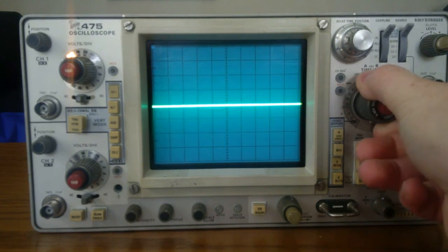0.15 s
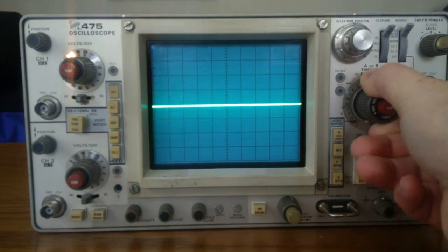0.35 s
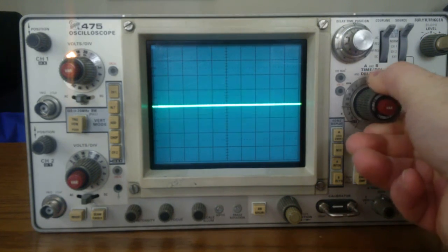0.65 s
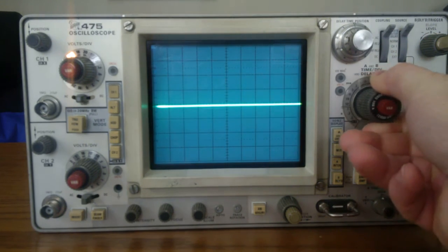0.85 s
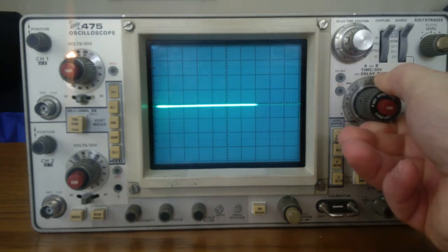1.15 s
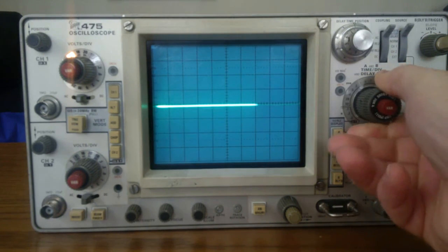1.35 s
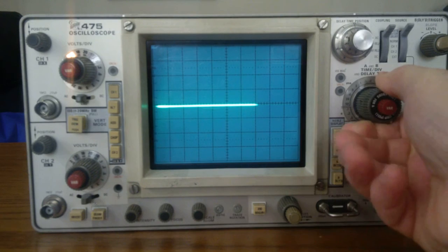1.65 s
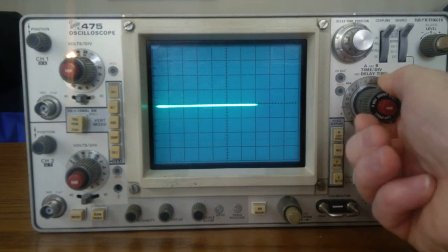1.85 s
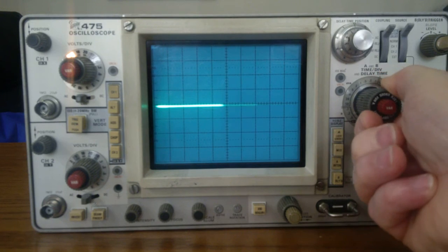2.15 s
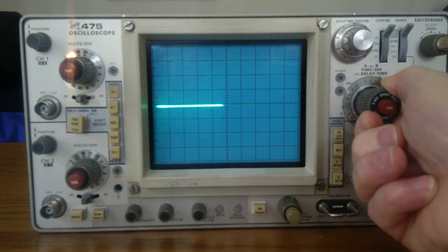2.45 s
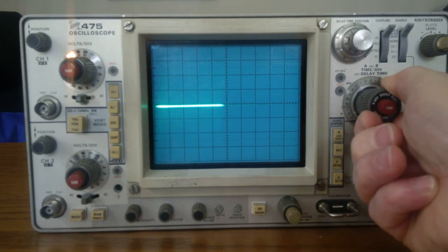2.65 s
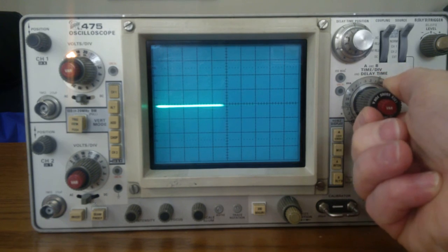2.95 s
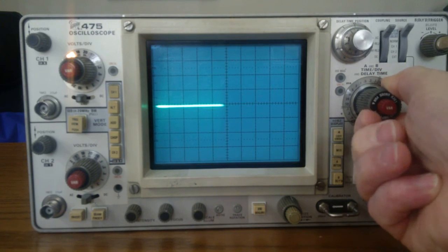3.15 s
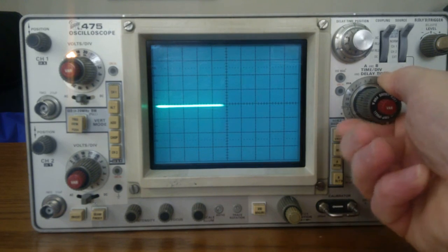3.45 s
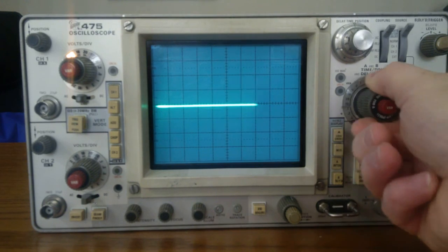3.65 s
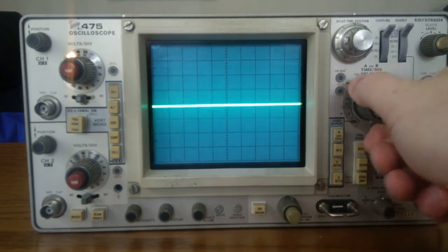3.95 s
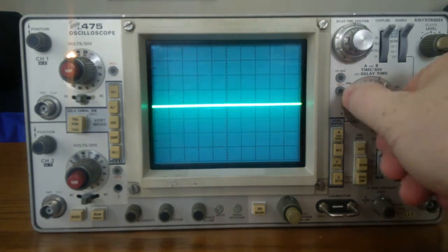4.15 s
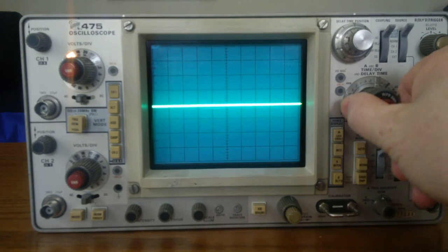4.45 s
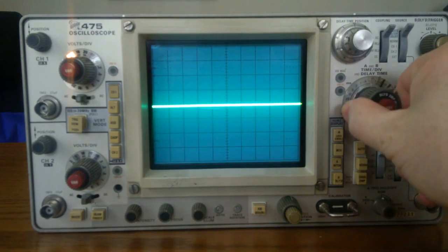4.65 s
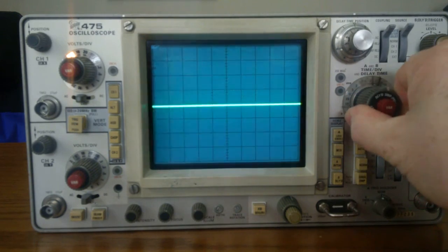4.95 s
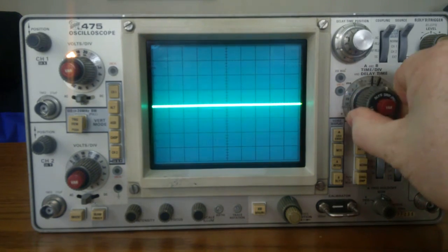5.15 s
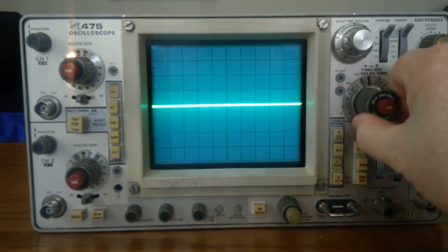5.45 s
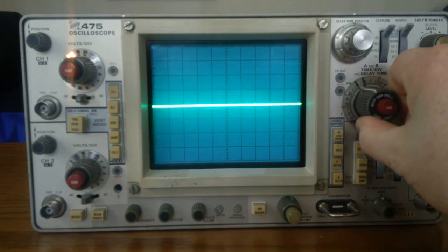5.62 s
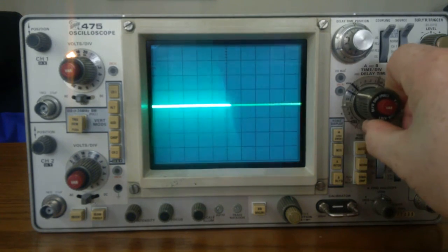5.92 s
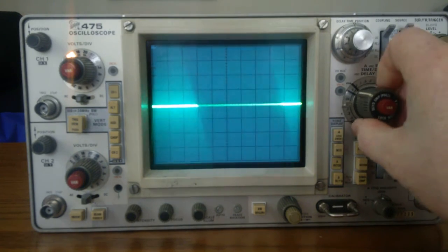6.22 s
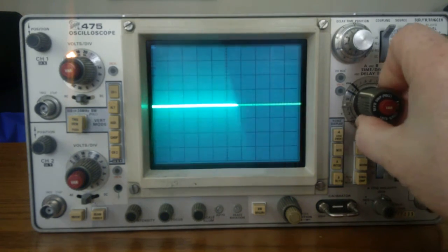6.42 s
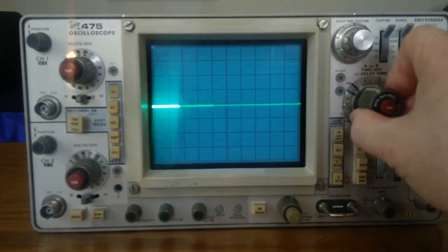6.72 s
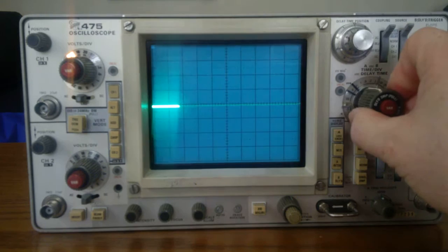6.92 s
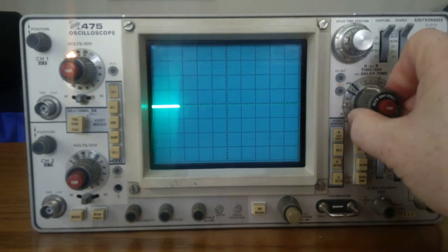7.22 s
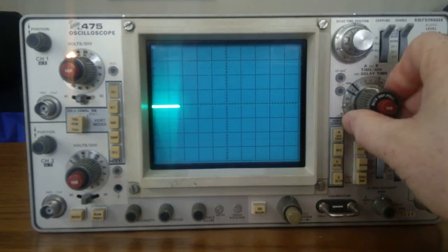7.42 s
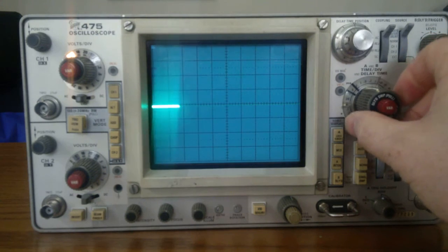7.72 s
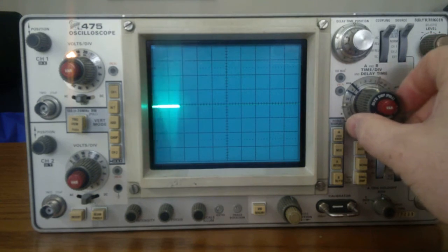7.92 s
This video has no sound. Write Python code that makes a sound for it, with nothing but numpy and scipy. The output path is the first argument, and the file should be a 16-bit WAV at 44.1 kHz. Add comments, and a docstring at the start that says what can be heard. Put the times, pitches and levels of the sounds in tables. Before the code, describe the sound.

A quiet cooling fan whirs steadily with a faint low hum beneath a close rotary switch in a small room; an earlier click's ring is just dying. From 0.1 to 1.1 seconds come five hard, bright snaps, roughly four a second, each with a hollow knock, panel clack and brief metallic ring; the first leaves a thin spring singing. A faint tick follows, then one lone clunk at 2.2. The knob rocks softly at 3.3. At 3.7 it turns back with a firm clack, then a rapid, lighter ratchet of scrapy clicks, about ten to fifteen a second until 4.3, widening to steady, stronger clacks about five a second through 5.9. A weak click falls at 6.2, small knob rattles at 6.5, and a light double click around 6.8. Tiny dry taps at 7.3-7.6 and sparse distant tinny ticks finish over the fan.

```python
"""A cooling fan whirs under the last ringing of an earlier step as an oscilloscope's time-base switch is turned.
It goes through its detents step by step, then in a quick run, with faint ticks and taps among them.
At each step shaped noise is the spring scraping over the cam and snapping into the next notch;
decaying sines ring the metal parts and the case, and noise bursts give the knock and the panel clack.
A small room answers with decaying stereo noise; the fan is coloured noise with wavering tones."""
import sys
import numpy as np
from scipy import signal
from scipy.fft import rfft, irfft, next_fast_len
from scipy.io import wavfile
from scipy.ndimage import uniform_filter1d, map_coordinates

SR = 44100
rng = np.random.default_rng(int(sys.argv[2]) if len(sys.argv) > 2 else 0)


def output_pcm(signal):
    """Save a mono or channel-first signal as 16-bit PCM at the path in sys.argv[1].

    Samples are clipped to [-1, 1] before scaling.
    """
    pcm = np.clip(np.atleast_2d(signal).T, -1, 1) * 32767
    wavfile.write(sys.argv[1], SR, np.round(pcm).astype(np.int16))


N = 356328  # length in samples

# switch steps: snap_s, nominal level_db (each layer adds its own offset), scrape_s before the snap
STEPS = [(0.0774, -18, 0.0028), (0.2958, -17.5, 0.0014), (0.5091, -18, 0.0015), (0.773, -19, 0.0015),
         (1.0604, -17.5, 0.0017), (2.2096, -19.5, 0.0022), (3.7309, -22, 0.0069), (3.8261, -25, 0.0083),
         (3.8908, -27.5, 0.0092), (3.9537, -26.5, 0.0083), (4.0379, -26.5, 0.0072), (4.1331, -26.5, 0.0067),
         (4.2262, -27, 0.0089), (4.3191, -25.5, 0.0097), (4.4566, -25, 0.0095), (4.661, -24.5, 0.0077),
         (4.8511, -23.5, 0.0089), (5.066, -23.5, 0.0044), (5.29, -22.5, 0.0028), (5.479, -24, 0.0057),
         (5.6077, -22.5, 0.0053), (5.765, -24.5, 0.0068), (5.8924, -22, 0.0039), (6.2261, -34, 0.00091),
         (6.7785, -26, 0.001), (6.848, -30.5, 0.001)]
# the knob rocking in its play under the fingers, plus one soft dull tap at 6.562 s: start_s, nominal level_db,
# nominal brightness_db
KNOB_PLAY = [(3.2651, -34, -13.5), (3.6672, -43.5, -17), (6.4996, -41, -30), (6.5161, -36, -6),
             (6.562, -43.5, -32)]
# relative spectrum of the spring on the cam: frequency_hz, level_db
SNAP_SPECTRUM = [(150, -21), (500, -9), (1000, -9.5), (1500, -4.5), (2000, -7), (2400, 1.5), (3400, 1.5),
                 (4400, -3), (5500, 0), (8300, 0.5), (10200, -2), (12000, -16), (15500, -14)]
# relative spectrum of the dull knock: frequency_hz, level_db
THUD_SPECTRUM = [(60, -26.5), (110, -13.5), (200, -9), (330, -1), (550, 0.5), (750, -7), (1100, -15),
                 (2500, -38.5)]
TURN_BACK_S = 3  # when the knob starts to turn the other way


def amp(db):
    """Decibels to gain."""
    return 10 ** (np.asarray(db) / 20)


def unit(x):
    """x scaled to rms 1."""
    return x / np.sqrt(np.mean(x ** 2) + 1e-20)


def along(points, hz):
    """Read a (frequency_hz, value) curve on a log frequency axis."""
    point_hz, value = np.transpose(points)
    return np.interp(np.log(hz + 1), np.log(point_hz + 1), value)


def filtered(x, response):
    """Multiply the spectrum of x by a response of frequency."""
    n = x.shape[-1]
    padded = next_fast_len(n + 8192)
    spectrum = rfft(x, padded) * response(np.fft.rfftfreq(padded, 1 / SR))
    return irfft(spectrum, padded)[..., :n]


def colour(spectrum, bright_db=0, size=2048):
    """Minimum-phase impulse response of energy 1; brightness tilts it around 5 kHz."""
    hz = np.fft.rfftfreq(size, 1 / SR)
    tilt = along([(3000, -.5), (8000, .5)], hz)
    db = along(spectrum, hz) + bright_db * tilt
    # folding the cepstrum makes the response causal
    cepstrum = irfft(np.log(amp(db)))
    cepstrum[1:size // 2] *= 2
    cepstrum[size // 2 + 1:] = 0
    h = irfft(np.exp(rfft(cepstrum)))
    return h / np.linalg.norm(h)


def add(track, s, sound):
    """Mix a sound into the track at s seconds."""
    i = max(round(s * SR), 0)
    track[i:i + len(sound)] += sound[:N - i]


def wobble(rate):
    """A smooth random curve with rate knots a second."""
    knots = rng.standard_normal(int(N * rate / SR) + 4)
    return map_coordinates(knots, [np.arange(N) * rate / SR])


def ring(modes, scatter_db, attack):
    """Decaying sine modes of total starting rms about 1, struck at new strengths each time."""
    t = np.arange(SR // 2) / SR
    hz, db, t60 = np.transpose(modes)[:, :, None]
    gain = amp(db + scatter_db * rng.standard_normal(hz.shape))
    sines = np.sin(2 * np.pi * (hz * t + rng.random(hz.shape)))
    decay = np.exp(-np.log(1000) * t / t60)
    total = (gain * sines * decay).sum(0)
    return total * (1 - np.exp(-t / attack)) * np.sqrt(2 / np.sum(gain ** 2))


def burst(spectrum, t60, bright_db=0):
    """A coloured noise rattle that dies away exponentially."""
    t = np.arange(SR // 4) / SR
    rattle = rng.standard_normal(len(t)) * np.exp(-np.log(1000) * t / t60)
    return signal.fftconvolve(rattle, colour(spectrum, bright_db))


def fan(waver_db=-0.53):
    """Wavering air noise, partly alike left and right, with hum and unsteady blade tones."""
    # relative air spectrum: frequency_hz, level_db
    air_spectrum = [(12, -45.5), (20, -28), (113, -17.5), (168, -14.5), (399, -5), (434, -9), (472, -12),
                    (718, -11), (802, -11.5), (873, -18), (1220, -20), (2080, -34), (6360, -45.5),
                    (12100, -51), (16000, -63)]
    # left-right likeness of the air noise: frequency_hz, correlation (0 to 1)
    likeness = [(60, 0.55), (180, 0.93), (550, 0.98), (1650, 0.93), (4970, 0.26), (15000, 0.1)]
    # hum and blade tones: pitch_hz, level_db, wobble_hz (knots a second of the amplitude wobble)
    tones = [(118.4, -78, 2), (360, -66, 25), (403.7, -65, 9), (807.5, -66, 4)]

    def air_response(hz):
        # this angle shares power between mid and side to give the likeness
        angle = np.arccos(np.clip(along(likeness, hz), -1, 1)) / 2
        return amp(along(air_spectrum, hz)) * [np.cos(angle), np.sin(angle)]

    mid, side = filtered(rng.standard_normal((2, N)), air_response)
    level_db = -56.5 + waver_db * wobble(6)
    sound = amp(level_db) * unit(np.array([mid + side, mid - side]))
    t = np.arange(N) / SR
    for hz, db, wobble_hz in tones:
        strength = 1 + 0.36 * wobble(wobble_hz)
        tone = np.sin(2 * np.pi * hz * t + wobble(2 * wobble_hz))  # the phase drifts too
        sound = sound + amp(db) * unit(strength * tone)
    return sound


def room(x, gap=0.0068, bench_db=-7, walls_db=0.5, walls_life=0.011):
    """Stereo reverberation: weak bench echoes, strong first walls after a gap, then a smooth tail."""
    # decay of the room: frequency_hz, t60_s
    decay_times = [(150, .4), (400, .33), (1040, .27), (2760, .25), (7280, .24), (11000, .21), (16000, .18)]
    # stereo width of the room sound: frequency_hz, side_db
    width = [(100, -3.5), (500, -20), (1200, -33), (2800, -21.5), (5500, -9.5), (10000, -6), (14000, -1.5)]
    noise = rng.standard_normal((2, SR // 2))
    hz, t, bands = signal.stft(noise, SR, nperseg=256)
    bands = bands * np.exp(-np.log(1000) * t / along(decay_times, hz)[:, None])
    tail = signal.istft(bands, SR, nperseg=256)[1]
    t = np.arange(tail.shape[1]) / SR
    early_db = np.where(t < gap, bench_db, walls_db * np.exp((gap - t) / walls_life))
    tail = tail * amp(early_db)
    mid, side = tail / np.linalg.norm(tail[0])
    side = filtered(side, lambda hz: amp(along(width, hz)))
    return signal.fftconvolve(x[None], np.array([mid + side, mid - side]), axes=1)[:, :N]


def ticks():
    """Faint ticks from further off: short noise bursts with a tinny modal ring."""
    # start_s, nominal level_db
    tick_events = [(1.355, -45.5), (1.855, -42), (2.8186, -41.5), (5.223, -42.5), (6.1903, -44.5),
                   (6.6835, -42), (7.158, -46), (7.646, -41.5)]
    # relative spectrum: frequency_hz, level_db
    tick_spectrum = [(800, -33), (1800, -6), (2100, -1.5), (2900, 0.5), (3800, 0.5), (4600, -1),
                     (5300, -2.5), (6200, 3), (7000, -1), (8000, -10.5), (10000, -8), (12000, -36),
                     (16000, -30)]
    # tinny modes: pitch_hz, level_db, t60_s
    tin_modes = [(2100, -4, .1), (4500, -4, .11), (4750, -4, .1), (6100, 0, .1), (6800, 0, .09),
                 (9300, -6, .07), (10000, -6, .08)]
    track = np.zeros(N)
    for s, db in tick_events:
        tin = ring(tin_modes, scatter_db=3, attack=.001)
        add(track, s, amp(db - 5) * burst(tick_spectrum, t60=0.038))
        add(track, s, amp(db - 28.0) * tin)
    return track


def taps():
    """Very short close handling taps: a noise burst and one quickly damped ping each."""
    # start_s, nominal level_db, ping_hz
    tap_events = [(7.2821, -33.5, 5900), (7.3917, -47, 2710), (7.591, -42, 5570), (7.6094, -34.5, 3900)]
    # relative spectrum: frequency_hz, level_db
    tap_spectrum = [(200, -0.5), (1100, 6), (1700, 12), (2600, -7), (3900, -10), (6000, -1), (9000, -23),
                    (15000, -33.5)]
    track = np.zeros(N)
    for s, db, hz in tap_events:
        ping = ring([(hz, 0, .008)], 0, attack=0.00032)
        add(track, s, amp(db - 5.5) * burst(tap_spectrum, t60=0.011))
        add(track, s, amp(db - 6.5) * ping)
    return track


def flank(s):
    """Cam side at s seconds: scrape dB re snap, brightness dB, panel clack dB re its drive (all nominal)."""
    if s < TURN_BACK_S:
        return -4, 1.5, -12
    return -2.5, 0.8, -10


def housing():
    """Every snap rings the metal parts; its knock shakes the case, and both clack the front panel."""
    # spring, shaft and wafers: pitch_hz, level_db, t60_s
    metal_modes = [(1446, 1, .22), (1527, -2, .2), (2203, -2, .22), (2491, -5, .2), (2835, 1, .18),
                   (3086, -4, .18), (3269, -3, .18), (5689, -1, .17), (6771, -1, .14), (8286, -2, .15)]
    # panels and chassis: pitch_hz, level_db, t60_s
    case_modes = [(135, -17, .3), (193, -9, .35), (228, -8, .28), (272, -1, .38), (310, -4, .16),
                  (330, 1, .24), (393, 0, .27), (442, -5, .18), (470, -6, .18), (534, -3, .16),
                  (563, 0, .22), (645, -7, .2), (780, -11, .2)]
    # the spring when left singing: pitch_hz, level_db, t60_s
    spring_modes = [(2205, -2, .35), (2305, -3, .35), (2370, 0, .44)]
    # relative spectrum of the panel clack: frequency_hz, level_db
    panel_spectrum = [(500, -20), (900, -9.5), (1250, 1), (1480, 5), (1700, -5), (1870, 5), (2050, -13),
                      (3000, -25)]
    # relative spectrum of the bench thump: frequency_hz, level_db
    thump_spectrum = [(20, -8.5), (45, 3), (80, -13.5), (160, -24.5), (500, -57.5)]
    # knock level set by the hand, lighter in the quick run, easing off at the end: time_s, nominal level_db
    push = [(0.08, -33), (2.21, -34.5), (3.73, -32.5), (3.88, -37), (4.14, -38.5), (4.45, -35.5),
            (4.7, -31), (5.29, -34), (5.9, -33.5), (6.85, -50.5)]
    snap_share = 0.45  # the panel is driven partly by the snap, partly by the knock

    track = np.zeros(N)
    for s, db, _ in STEPS:
        knock_db = np.interp(s, *np.transpose(push))
        _, _, panel_db = flank(s)
        clack_db = panel_db + snap_share * db + (1 - snap_share) * knock_db
        metal = ring(metal_modes, scatter_db=2.5, attack=.001)
        case = ring(case_modes, scatter_db=2, attack=.002)
        add(track, s, amp(db - 16.0) * metal + amp(knock_db + 1.0) * case)
        add(track, s, amp(clack_db + 1) * burst(panel_spectrum, t60=0.23))
        add(track, s, amp(knock_db) * burst(THUD_SPECTRUM, t60=0.21))
        if s < TURN_BACK_S:  # until the knob is turned the other way, the snaps also thump the bench
            add(track, s, amp(db - 38.5) * burst(thump_spectrum, t60=.25))
    for s, db, _ in KNOB_PLAY:
        add(track, s, amp(db - 14) * burst(THUD_SPECTRUM, t60=0.22))
    # an earlier step is still dying away, and the first new one leaves the spring singing
    add(track, 0, amp(-63.5) * burst(SNAP_SPECTRUM, t60=0.31, bright_db=-6.5))
    add(track, STEPS[0][0], amp(-40.5) * ring(spring_modes, 0, attack=.001))
    return track


def detent(lead, scrape_db, bright_db, grain_db=3, creep_db=-14):
    """The spring creeps, scrapes down the cam, then snaps into the notch at 20 ms and chatters to rest."""
    t = np.arange(SR // 20) / SR - .02  # seconds from the snap
    onset, rise, hold, fall = .0008, .001, .0009, .0019  # s
    snap = np.exp(np.minimum(t + hold, 0) / rise - np.maximum(t - hold, 0) / fall)
    # smoothed noise makes the scrape uneven, like small slips
    slips = amp(grain_db * unit(uniform_filter1d(rng.standard_normal(len(t)), 40)))
    swell = np.exp(np.minimum(t + 0.81 * lead, 0) / onset)
    creep = amp(creep_db) * (t > -1.4 * lead)
    scrape = amp(scrape_db - 2.5) * slips * np.maximum(swell, creep) * (t < 0)
    force = np.maximum(snap, scrape)
    return signal.fftconvolve(force * rng.standard_normal(len(t)), colour(SNAP_SPECTRUM, bright_db - .5))


def clicks():
    """The switch rattle as it leaves in one direction; each call draws a fresh fine grain."""
    bright_per_db, usual_snap_db = 0.18, -22.5  # a harder snap is brighter
    track = np.zeros(N)
    for s, db, lead in STEPS:
        scrape_db, flank_db, _ = flank(s)
        bright_db = flank_db + bright_per_db * (db - usual_snap_db)
        start = s - .02  # the snap falls 20 ms into the sound
        add(track, start, amp(db + 0.5) * detent(lead, scrape_db, bright_db))
    for s, db, bright_db in KNOB_PLAY:
        add(track, s, amp(db - 13.0) * burst(SNAP_SPECTRUM, t60=0.062, bright_db=bright_db + 4.5))
    return track


def scene():
    """The switch is near, the ticks have more room sound than direct sound, the taps are almost dry."""
    # width of the case vibration: frequency_hz, side_db
    case_width = [(40, 2), (130, -3), (300, -11.5), (550, -9), (1200, -19.5)]
    case, far, near = housing(), ticks(), taps()
    # the wide panels reach left and right out of step
    spread = filtered(housing(), lambda hz: amp(along(case_width, hz)))
    direct = clicks() + amp(0.5) * case + np.array([spread, -spread]) + amp(-3) * far + near
    # two sides of the room each return their own share of the rattle
    front = room(amp(-4.5) * clicks() + amp(-1.0) * far)
    back = room(amp(-2.5) * clicks() + amp(-13.5) * near)
    balance = amp([[-.3], [.3]])  # slightly to the right
    return (direct + front + back) * balance + fan()


def record(dry):
    """A very steep low-pass removes the treble above the band limit."""
    top_hz = 15850
    return filtered(dry, lambda hz: 1 / np.sqrt(1 + (hz / top_hz) ** 200))


dry = scene()
out = record(dry)
output_pcm(out)
```